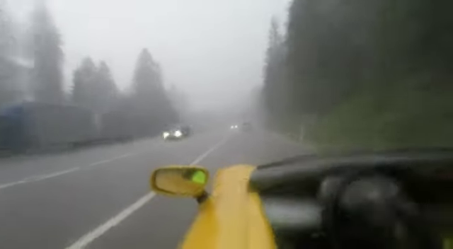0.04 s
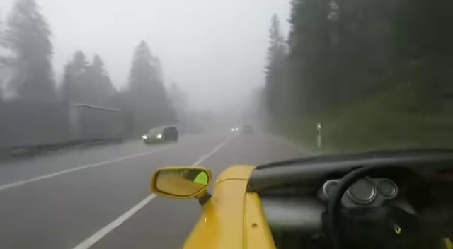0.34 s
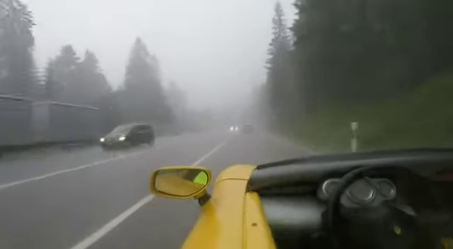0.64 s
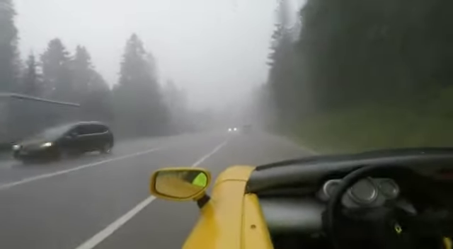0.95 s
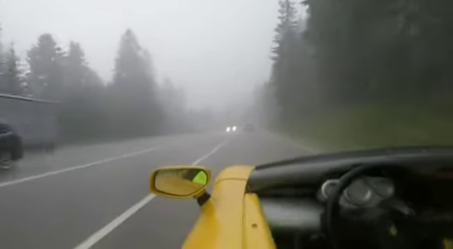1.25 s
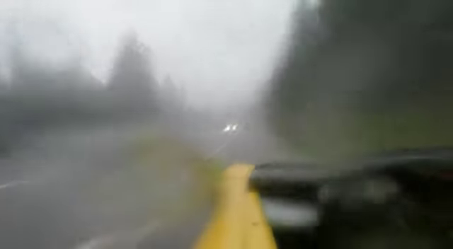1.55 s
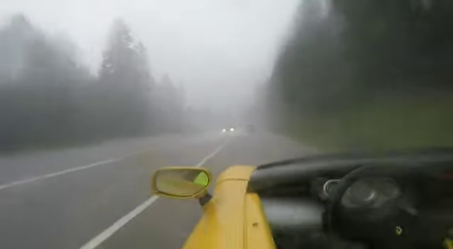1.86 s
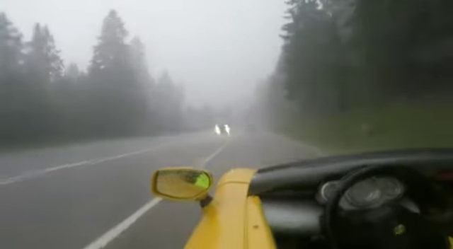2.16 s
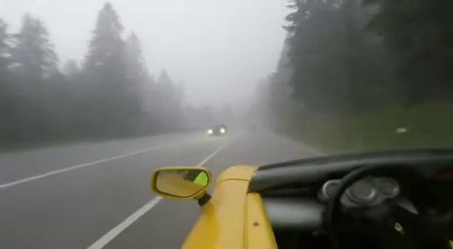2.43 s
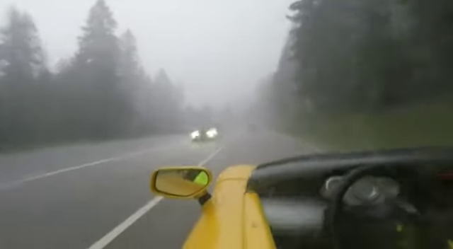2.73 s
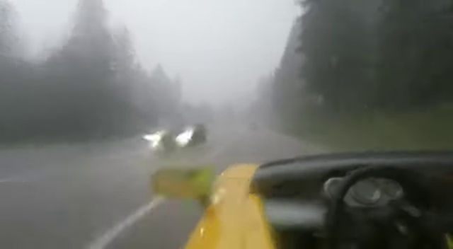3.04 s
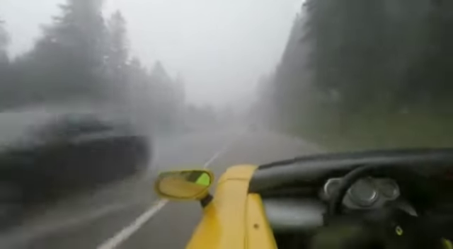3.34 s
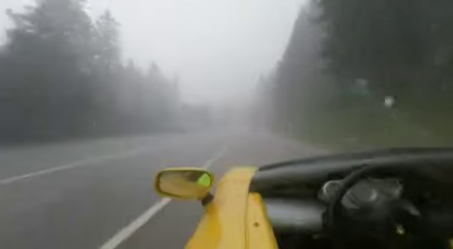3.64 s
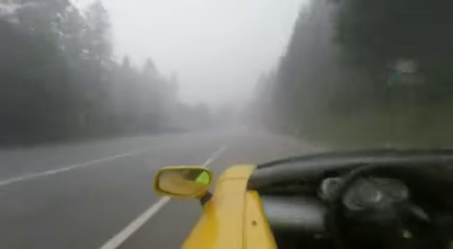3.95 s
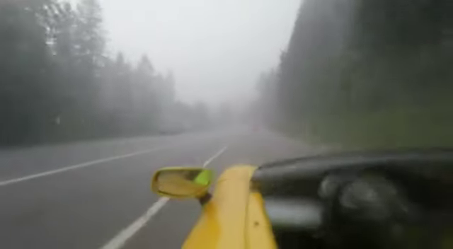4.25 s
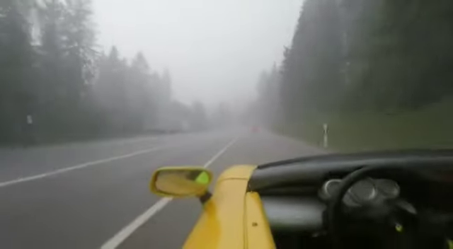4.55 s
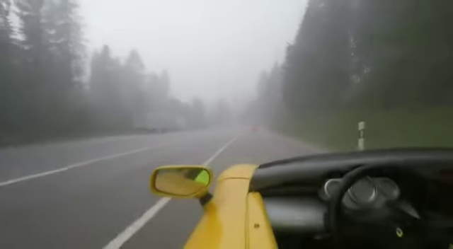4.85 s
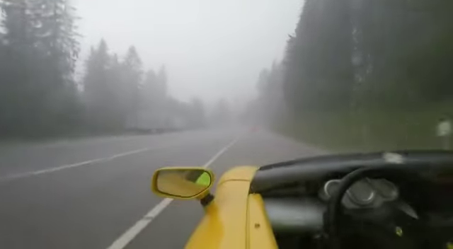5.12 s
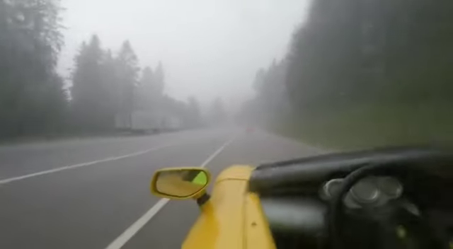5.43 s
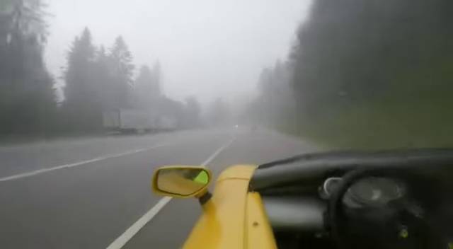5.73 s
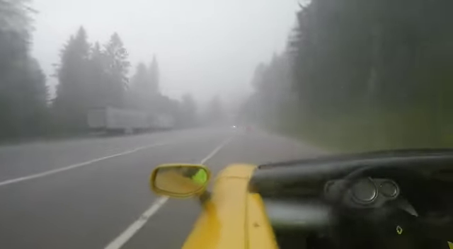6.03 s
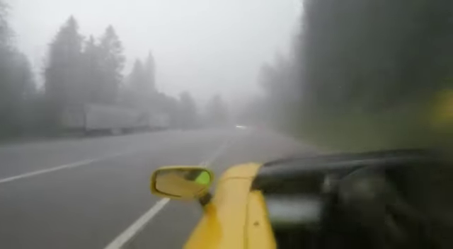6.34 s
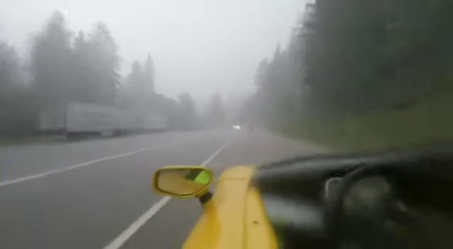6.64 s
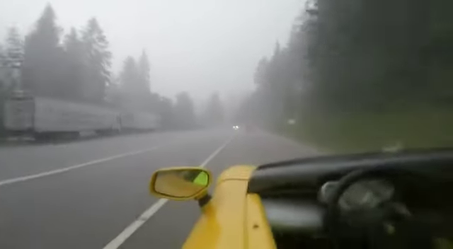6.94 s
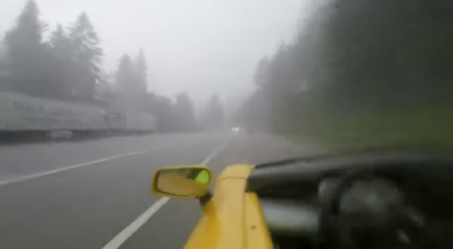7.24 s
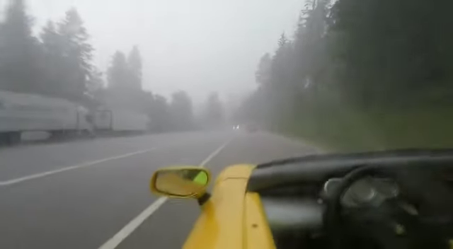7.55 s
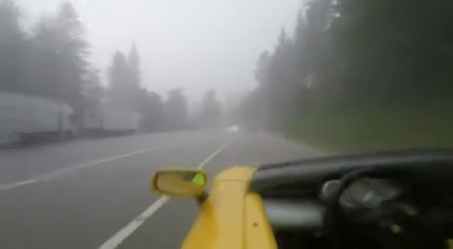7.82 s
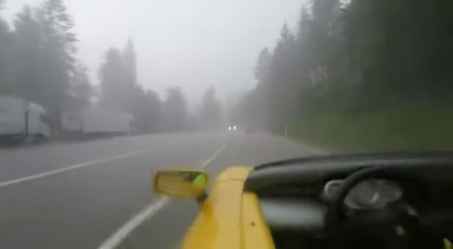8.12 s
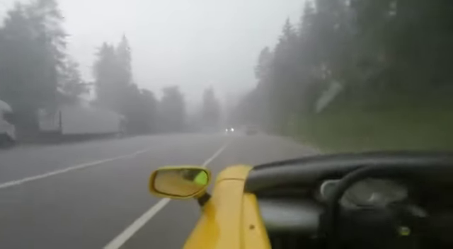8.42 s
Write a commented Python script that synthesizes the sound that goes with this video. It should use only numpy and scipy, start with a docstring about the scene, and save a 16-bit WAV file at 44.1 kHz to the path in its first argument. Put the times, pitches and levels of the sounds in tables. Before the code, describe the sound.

An open sports car drives through heavy rain, heard from a microphone out in the airstream. Wind rumbles and buffets in gusts over a low, steady engine drone. Raindrops hit the microphone housing irregularly with wet plops and sharp ticks above a fine patter. Spray swells as oncoming vehicles pass, and clinging water briefly muffles the weather. A few short sizzles and thin pings come through, and the wind strengthens near the end.

```python
"""Wind rumbles and buffets in gusts over a low engine drone: an open sports car in heavy rain, heard
from a camera housing out in the airstream. Raindrops strike at road speed, plopping in the water film
and ticking in the shell; a few ping a hard part, and water sizzles through a seam. Gusts and oncoming
traffic throw sheets of spray. Water clinging over the microphone port briefly muffles the weather.
A limiter holds the peaks."""
import sys
import numpy as np
from scipy import signal
from scipy.fft import rfft, irfft
from scipy.io import wavfile
from scipy.ndimage import uniform_filter1d, minimum_filter1d

SR = 44100
rng = np.random.default_rng(int(sys.argv[2]) if len(sys.argv) > 2 else 0)


def pcm_store(signal):
    """Save signal as 16-bit PCM."""
    levels = np.round(np.clip(np.atleast_2d(signal), -1, 1) * 32767)
    wavfile.write(sys.argv[1], SR, levels.astype(np.int16).T)


N = 373968
T = np.arange(N) / SR

# Direct hits. Each row: time in seconds, plop in dB, plop pitch in Hz, tick in relative dB,
# tick pitch in Hz.
BIG_DROPS = [(0.051, -0.5, 1570, -15.5, 4330), (0.2754, -13, 1640, -14, 4660),
             (0.4673, -11, 2090, -15, 4360), (.476, -7, 1480, -6.5, 5330), (.636, -10.5, 2100, -16, 4230),
             (0.839, -.5, 1920, -27, 4100), (1.0274, -6.5, 1970, -20.5, 2700),
             (1.0583, -4, 1480, -23, 3990), (1.079, -16, 2120, -18, 2700), (1.271, -25, 1500, -22, 2900),
             (1.5051, -14, 1350, -1, 5300), (1.514, -11, 1300, -15, 4140), (1.8834, 1.5, 1930, -17, 4230),
             (1.9053, -6, 1440, -35.5, 4590), (2.201, -32, 1500, -15, 4640), (2.2114, -10, 2120, 2, 5100),
             (2.2842, -14, 1400, -10.5, 4960), (2.379, -11, 2070, -16.5, 4330), (3.005, 1, 1400, -8, 3620),
             (3.0909, -8.5, 820, -24, 4320), (3.118, -9.5, 1510, -43, 4300), (3.138, -13, 1480, -45, 4300),
             (3.1529, -14, 1430, -13.5, 4300), (3.1922, -5.5, 1070, -38, 4260),
             (3.4721, -2.5, 1100, -14, 3820), (3.5492, -3, 1830, -14, 4700), (3.5838, -1, 1740, -24, 4550),
             (3.6557, -37, 1040, -15, 5100), (3.7742, -23, 1940, -8.5, 4500), (3.8222, -12, 1730, -7, 4840),
             (4.0322, -21, 1920, -11, 5800), (4.2306, -8, 1540, -12, 4800), (4.2626, -3, 1100, -16.5, 4060),
             (4.3697, 4, 1330, -23, 4360), (4.473, -12, 2230, -11.5, 4200), (4.631, -12, 1820, -9.5, 4500),
             (5.0948, -2.5, 1530, -4, 5830), (5.1387, -18, 1270, -17.5, 4380),
             (5.199, -12.5, 1590, -41, 4400), (5.307, -7.5, 2030, -18, 4400), (5.5038, -4, 1600, -31, 4380),
             (5.598, -20, 1330, -17.5, 3980), (5.699, -2.5, 2040, 5, 5030), (5.799, -15.5, 2020, -46, 4400),
             (5.8673, -5, 1870, -18, 4530), (5.875, -8, 1790, -14.5, 4200), (6.17, -8, 1910, -20, 4400),
             (6.4253, -6.5, 1500, -36, 4120), (6.4516, -9, 1280, -45, 4040), (6.554, -4, 1830, -16, 4170),
             (6.5824, 3.5, 1920, -15, 5150), (6.706, -20, 1520, -16, 3900), (6.7193, -2.5, 1000, -10, 4300),
             (6.8867, -20, 1780, -15, 4640), (6.9686, -5, 1370, -22.5, 4530), (7.117, -4, 1110, -18, 4510),
             (7.205, -4, 1350, -11, 4480), (7.314, -4, 1550, -14.5, 4700), (7.33, -7, 1020, -38, 4400),
             (7.5774, -18, 1570, -17.5, 4200), (7.9342, -16, 1553, -14, 4270), (7.979, -1, 1520, -20, 4780),
             (8.0072, -7.5, 1080, -14.5, 4620), (8.0456, -14, 1570, -14.5, 5160),
             (8.2946, -7, 1670, -6, 4330)]
# Spectrum of the struck shell. Each row: frequency in Hz, relative level in dB.
TICK_SPECTRUM = [(300, -12), (1200, -14.5), (2100, 8.5), (2600, 1), (3150, -2), (3900, 2), (4500, 1),
                 (5400, -3.5), (6300, -10), (7150, -17), (8700, -14.5), (10500, -30), (12500, -48),
                 (16000, -50)]


def undb(db):
    """Decibels to gain."""
    return 10 ** (np.asarray(db) / 20)


def unit(x):
    """Scale to rms 1."""
    return x / np.std(x)


def curves(table):
    """Columns interpolated linearly over the first, time in seconds."""
    times_s, *columns = np.transpose(table)
    return [np.interp(T, times_s, column) for column in columns]


def gains(spectrum, size):
    """Gain of a (Hz, dB) spectrum at each FFT bin."""
    hz, db = np.transpose(spectrum)
    bin_hz = np.fft.rfftfreq(size, 1 / SR) + 1e-9
    return undb(np.interp(np.log(bin_hz), np.log(hz), db))


def noise(spectrum):
    """Coloured noise, rms 1."""
    return unit(irfft(rfft(rng.standard_normal(N)) * gains(spectrum, N), N))


def walk(hz):
    """Smooth random drift up to about hz, rms 1."""
    lowpass = np.exp(-(np.fft.rfftfreq(N, 1 / SR) / hz) ** 2)
    return unit(irfft(rfft(rng.standard_normal(N)) * lowpass, N))


def add(out, start_s, sound):
    """Mix a sound in at start_s."""
    i = int(np.clip(start_s * SR, 0, N - 1))
    out[i:i + len(sound)] += sound[:N - i]


def ring(spectrum, peak_hz=4400, peak_db=0, size=512):
    """Minimum-phase response to a blow; the spot struck favours one resonance. Peak 1."""
    bump = np.exp(-((np.fft.rfftfreq(size, 1 / SR) / peak_hz - 1) / .14) ** 2)
    cepstrum = irfft(np.log(gains(spectrum, size) * undb(peak_db * bump)))
    cepstrum[1:size // 2] *= 2
    cepstrum[size // 2 + 1:] = 0
    response = irfft(np.exp(rfft(cepstrum)))
    return response / np.abs(response).max()


def plop(hz, rise_cycles, size=1000):
    """A resonance, such as an air pocket in water, swells for rise_cycles and dies away."""
    cycles = hz * np.arange(size) / SR
    envelope = (cycles / rise_cycles) ** 2 * np.exp(2 - 2 * cycles / rise_cycles)
    return np.sin(2 * np.pi * cycles) * envelope


def rumble(level_db):
    """Low noise of the airstream on the housing."""
    # Each row: frequency in Hz, relative level in dB.
    spectrum = [(10, -9.5), (22, -4.5), (45, -0.5), (62, 0), (85, -1), (115, 0), (160, -6), (230, -14),
                (400, -23.5), (4000, -120)]
    return noise(spectrum) * undb(level_db)


def engine():
    """The exhaust drones at the firing rate and its octave, made unsteady by the airstream."""
    # Each row: time in seconds, firing rate in Hz, level in dB.
    drive = [(0, 67.3, -19), (.5, 66.5, -22), (1.5, 67.4, -38), (3, 68.13, -21), (6.3, 69.6, -22),
             (7.1, 69.37, -17), (8.48, 70, -30)]
    firing_hz, level_db = curves(drive)
    phase = 2 * np.pi * np.cumsum(firing_hz * (1 + 0.012 * walk(hz=6.0))) / SR
    drone = np.sin(phase) + undb(-7.5) * np.sin(2 * phase)
    return unit(drone * undb(1.6 * walk(hz=6.3))) * undb(level_db)


def buffeting(buffet_db, rush_db):
    """Small eddies burst on the housing and shake its rush with them."""
    # Wind spectra. Each row: frequency in Hz, relative level in dB.
    buffet_spectrum = [(10, -52), (70, -36.5), (140, 2.5), (240, 1), (400, -5), (700, -7.5), (1050, -13.5),
                       (1600, -19), (2600, -56.5), (12000, -110)]
    rush_spectrum = [(150, -55.5), (600, -16), (880, -10), (1050, 1.5), (1200, -3.5), (1550, -1.5),
                     (2200, -10.5), (3100, -29), (4400, -23.5), (6200, -38), (7500, -45.5), (9500, -50.5),
                     (12000, -99.5)]
    eddies = walk(hz=38.6)
    buffet = unit(noise(buffet_spectrum) * undb(2.62 * eddies))
    rush = unit(noise(rush_spectrum) * undb(2.0 * eddies + 4.4 * walk(hz=149)))
    return buffet * undb(buffet_db + 2.17) + rush * undb(rush_db - 3.5)


def patter(level_db, drops_per_s=700, spread_db=12.5):
    """Fine drops of very unequal size tick in flurries on spots of the shell, each with its own colour."""
    # Shell resonances in Hz, one per spot.
    shell_hz = [1640, 2500, 3600, 4090, 4470, 5240, 5960, 6050]
    per_spot = int(drops_per_s * N / SR / len(shell_hz))
    flurry_db = 2 * walk(hz=14)
    out = np.zeros(N)
    for peak_hz in shell_hz:
        hits = np.zeros(N)
        at = rng.integers(0, N, per_spot)
        size_db = spread_db * np.minimum(rng.standard_normal(per_spot), 2.4)
        hits[at] = undb(size_db + flurry_db[at])
        out += signal.oaconvolve(hits, ring(TICK_SPECTRUM, peak_hz, peak_db=11))[:N]
    return unit(out) * undb(level_db)


def splashes(level_db, count=700, spread_db=5.5):
    """Middling drops plop in the water film, each near a resonance of the housing."""
    # Hollow resonances in Hz.
    hollow_hz = [845, 1014, 1025, 1302, 1580, 2104]
    pitches_hz = rng.choice(hollow_hz, count)
    starts_s = rng.random(count) * N / SR
    scatter = rng.standard_normal((count, 3)).clip(-2, 1.6)
    out = np.zeros(N)
    for start_s, hz, (size, detune, length) in zip(starts_s, pitches_hz, scatter):
        water = plop(hz * np.exp(0.044 * detune), rise_cycles=1.8 * np.exp(.35 * length))
        add(out, start_s, undb(spread_db * size) * water)
    return unit(out) * undb(level_db)


def big_drops(lead_s=0.000944, collapse_s=0.00056, deep_db=28, cycles_per_db=0.2):
    """Direct hits: water plops over a hollow knock, the shell ticks, the hardest hits crack."""
    # Each row: frequency in Hz, relative level in dB.
    crack_spectrum = [(1000, -46), (3000, -35), (7000, 6.5), (8600, 9), (10500, -2), (13000, -13.5),
                      (15000, -16), (17000, -53)]
    crack = ring(crack_spectrum)
    knock = undb(-10.5) * plop(hz=694, rise_cycles=1.0)
    out = np.zeros(N)
    for hit_s, plop_db, plop_hz, tick_db, tick_hz in BIG_DROPS:
        # In deep water a drop hardly ticks and rings longer.
        extra_cycles = cycles_per_db * max(plop_db - tick_db - deep_db, 0)
        water = plop(plop_hz, rise_cycles=1.2 + extra_cycles)
        tick = undb(tick_db + 6.5) * ring(TICK_SPECTRUM, tick_hz, peak_db=6)
        crack_db = 2.26 * tick_db - 3  # harder hits are brighter
        add(out, hit_s - lead_s, undb(plop_db) * (water + knock))
        add(out, hit_s, tick + undb(crack_db) * crack)
        # The flattened drop collapses and taps again, colouring each hit differently.
        add(out, hit_s + collapse_s * (.5 + rng.random()), undb(-2.5) * tick)
    return out


def wet_port(depth_db=6.0, clear_s=0.042, delay_s=0.0065):
    """Port gain: each big drop covers the microphone port until the wind blows it clear."""
    cover = np.zeros(N)
    clearing = np.exp(-T[:SR // 2] / clear_s)
    for hit_s, plop_db, _, tick_db, _ in BIG_DROPS:
        water = min(np.hypot(undb(plop_db), undb(tick_db)), 1)
        add(cover, hit_s + delay_s, water * clearing)
    return undb(-depth_db * uniform_filter1d(np.minimum(cover, 1), size=64))


def sprays():
    """Extra rain in dB as gusts throw sheets of spray; the first three come with oncoming vehicles."""
    # Each row: peak time in seconds, half width in seconds, extra rain in dB.
    sheets = [(.34, 0.068, 3.5), (1.2, 0.13, 3), (3.38, .17, 4), (4.53, 0.055, 7), (5.57, 0.13, 4),
              (6.99, 0.28, 3), (8.41, 0.074, 11.5)]
    return sum(db * np.exp(-((T - peak_s) / width_s) ** 2) for peak_s, width_s, db in sheets)


def pings(hz=2750):
    """Drops ring a small hard part at one thin pitch."""
    # Each row: start in seconds, level in dB.
    strikes = [(.35, -28), (5.55, -33), (6.05, -25), (6.858, -26), (6.956, -21), (7.526, -22), (7.724, -26),
               (7.876, -20.5)]
    out = np.zeros(N)
    for start_s, level_db in strikes:
        add(out, start_s, undb(level_db) * plop(hz, rise_cycles=7.5, size=1200))
    return out


def clinging_water(peel_s=0.0069):
    """Port gain: a water film closes the port at once, holds, then peels off in the wind."""
    # Each row: start in seconds, hold in seconds, attenuation in dB.
    films = [(0.488, .055, 6.5), (1.507, 0.034, 3.5), (1.884, 0.083, 2.5), (2.214, 0.23, 6.5),
             (2.96, .105, 2.5), (3.551, 0.054, 5.5), (3.784, 0.044, 5.5), (4.349, 0.049, 6.5),
             (5.098, 0.081, 2.5), (5.699, 0.075, 8), (6.031, 0.07, 4), (6.557, 0.069, 1.5),
             (7.209, 0.098, 7), (8.296, 0.11, 5.5)]
    muffle_db = np.zeros(N)
    for start_s, hold_s, depth_db in films:
        peeling = np.exp(-np.maximum(T - start_s - hold_s, 0) / peel_s)
        muffle_db += depth_db * (T > start_s) * peeling
    return undb(-uniform_filter1d(muffle_db, size=200))


def sizzles(flutter_db=3):
    """Water squeezed through a seam fizzes and whistles in short bursts."""
    # Each row: start in seconds, length in seconds, fizz in dB, whistle in dB.
    bursts = [(2.189, .1, -32.5, -54), (4.64, 0.078, -54, -55), (5.672, 0.04, -47, -40),
              (5.864, 0.18, -59, -48)]
    # Seam spectra. Each row: frequency in Hz, relative level in dB.
    fizz_spectrum = [(1000, -5), (2300, -13), (3400, -31), (4100, -6), (4550, -7), (5200, -9), (6200, -13),
                     (7000, -65), (9200, -32), (14000, -54)]
    whistle_spectrum = [(3000, -80), (4000, -35), (4450, -11), (4650, -4), (4900, -8), (5400, -36),
                        (7000, -90)]
    fizz, whistle = noise(fizz_spectrum), noise(whistle_spectrum)
    out = np.zeros(N)
    for start_s, length_s, fizz_db, whistle_db in bursts:
        gate = 1. * ((T > start_s) & (T < start_s + length_s))
        out += uniform_filter1d(gate, size=200) * (undb(fizz_db) * fizz + undb(whistle_db) * whistle)
    return out * undb(flutter_db * walk(hz=80))


def scene(sway_db=0.82, patter_db=-38):
    """Wind and rain sway in the same gusts; water on the port ducks buffeting, patter and splashes."""
    # Wind on the housing. Each row: time in seconds, then rumble, buffeting and rush in relative dB.
    airstream = [(0.0, -10.5, -21.5, -26), (0.47, -14, -18, -24.5), (0.87, -12.5, -19.5, -25.5),
                 (1.3, -11, -18.5, -21.5), (1.73, -12.5, -18.0, -26.5), (2.47, -14.0, -23, -21.5),
                 (2.87, -11.5, -17.5, -31.5), (2.98, -16.0, -29, -26), (3.24, -16.5, -38, -21),
                 (3.36, -13, -22.5, -23), (3.55, -15.0, -21, -20), (4.53, -13.5, -16.5, -25.5),
                 (5.13, -16.5, -17, -27.5), (5.63, -18, -29, -23.5), (6.3, -16.5, -17, -24),
                 (6.55, -16, -28, -19.5), (6.8, -15.5, -22, -23), (7.18, -14.5, -13, -23),
                 (7.46, -16.5, -18.0, -22.5), (7.74, -11, -14, -17), (7.94, -14, -20.0, -22),
                 (8.2, -12.5, -14.0, -21), (8.48, -12.5, -21, -23.5)]
    rumble_db, buffet_db, rush_db = curves(airstream)
    spray_db = sprays()
    gust_db = sway_db * walk(hz=8.2)
    push_db = 0.47 * spray_db + gust_db  # wind rises with each sheet of spray
    lows = rumble(rumble_db + gust_db) + engine()
    wind = buffeting(buffet_db + push_db, rush_db + push_db)
    rain = patter(patter_db + spray_db + gust_db) + splashes(rush_db + push_db - 4.5)
    weather = (wind + rain) * wet_port() * clinging_water()
    return (lows + weather + big_drops() + pings() + sizzles())[None]


def record(dry, ceiling=1.0, window_samples=48, cutoff_hz=15800):
    """A fast look-ahead limiter turns peaks down to the ceiling; a steep low-pass follows."""
    allowed = ceiling / np.maximum(np.abs(dry), ceiling)
    gain = uniform_filter1d(minimum_filter1d(allowed, window_samples), window_samples)
    lowpass = signal.ellip(8, .2, 70, cutoff_hz, fs=SR, output="sos")
    return signal.sosfilt(lowpass, dry * gain)


dry = scene()
out = record(dry)
pcm_store(out)
```